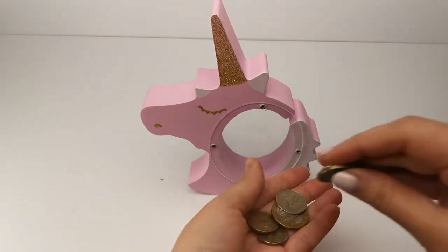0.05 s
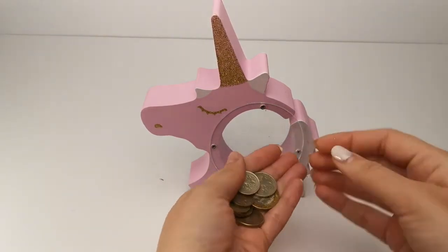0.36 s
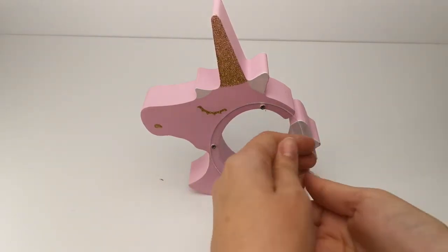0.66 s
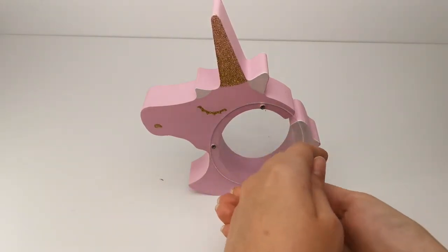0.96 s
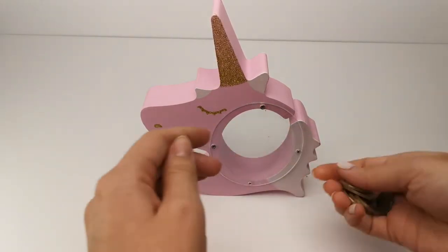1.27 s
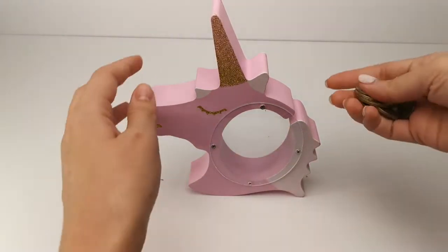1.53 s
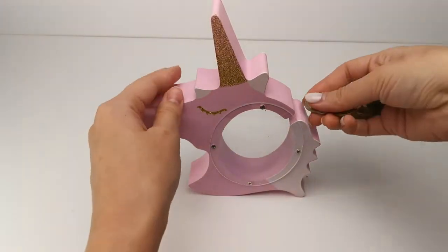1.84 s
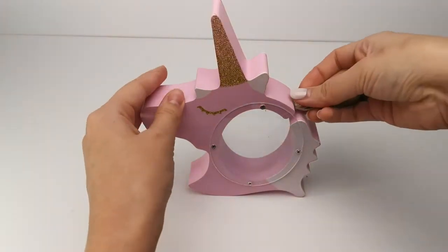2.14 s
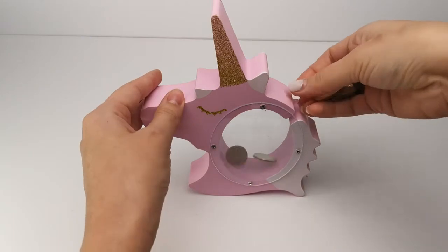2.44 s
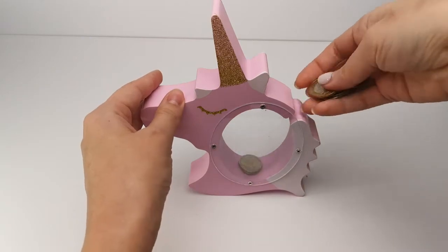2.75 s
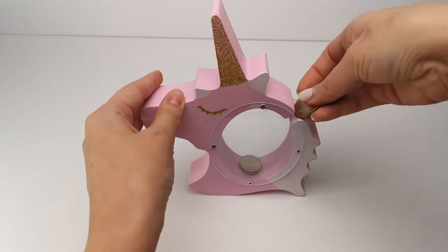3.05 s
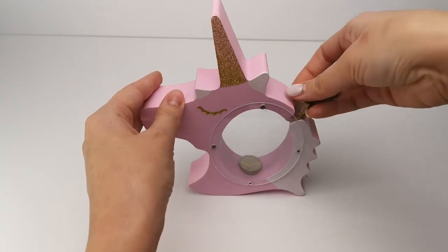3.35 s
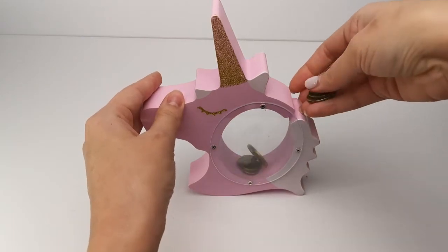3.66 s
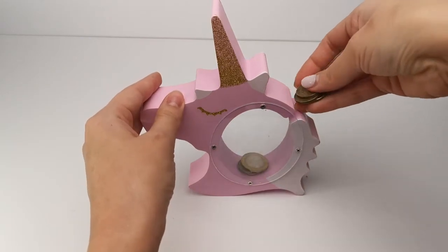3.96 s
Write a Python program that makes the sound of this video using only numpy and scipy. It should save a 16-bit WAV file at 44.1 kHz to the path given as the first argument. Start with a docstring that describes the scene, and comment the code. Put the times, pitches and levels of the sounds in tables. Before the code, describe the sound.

Coins clink and slide as they pass from one hand to the other. Then two scrape through the slot of a wooden money box in turn, dropping and rattling to rest, heard close up in a small, quiet room.

```python
"""A table in a small, quiet room, heard close up through a stereo pair of microphones.
For two seconds coins are gathered from one hand into the other, clinking and sliding, damped by the palm.
Then one knocks and scrapes through the slot of a wooden money box, drops at 2.5 s, bounces and rattles
to rest while the hollow box and the coin ring. A second scrapes in and lands at 3.7 s.
A short room tail follows each sound, and a faint rumble lies under it all."""
import sys
import numpy as np
from scipy import signal
from scipy.fft import rfft, irfft
from scipy.io import wavfile

SR = 44100
rng = np.random.default_rng(int(sys.argv[2]) if len(sys.argv) > 2 else 0)


def store_pcm(level_fs):
    """Save levels as 16-bit WAV."""
    pcm = np.round(np.clip(level_fs, -1, 1) * 32767).astype(np.int16)
    wavfile.write(sys.argv[1], SR, np.atleast_2d(pcm).T)


N = 176400

# Contacts: level is relative to the layer's gain, tone columns shade its colour, rattle adds scatter.
# Coins land and bounce in the box: (time [s], level [dB], thud [dB], hollow [dB], wood [dB], ring [dB],
# high ring [dB], top [dB], rattle [dB], left minus right [dB])
FALLS = [(2.4852, 21, -1.5, 1.5, -8, -10, -20, -30, 0.5, 2.5), (2.5128, -2, 2, 15, 25, 7, -3, -1, 7, 0.5),
         (2.5165, 1.5, 15.5, 17, 0, -18, -18, -20, 14, 7.5),
         (2.5298, 19, 8.5, 7.5, 1, -2.5, -21.5, -14.5, 5, 4.5),
         (2.576, -5.5, 11, 19.5, 13.5, 6, -24, -12, 8, 9), (2.599, 1.5, 4, 15.5, 17, -4, -34, -19, 16, 5.5),
         (2.637, 8.5, -16, -22, 1.5, 6, -9.5, -10, 19, 3),
         (2.6582, -3.5, -13, -19, 16, 9.5, 13.5, 13, 8, 11.5), (2.69, -1.5, 5, -6, 1.5, 9, 6, -7, 6, 6),
         (2.7182, -5.5, 2, 18, 14.5, 6, 14.5, 18, 40, 11.5), (2.738, -3, 4.5, 5, 2.5, -0.5, 11, 9, 23, 6),
         (3.6768, 2.5, 13.5, -4, 13.5, 8, 10, 5, 24, -0.5),
         (3.6882, 8.5, 10, 9.5, -1, 2.5, 5.5, 12, 8.5, 3.5), (3.6925, 4, 4, 16.5, -5.5, 10, 5, 2, -3, 5),
         (3.7335, -11.5, 19, 22.5, 20.5, -2, 8, 20, 0, 2), (3.7395, -3.5, 15, -12, -35, 6.5, 8, 16, 7, 5),
         (3.808, -10, 31, 11.5, 24.5, -4, 10, 24, 0, 1.5), (3.844, -3, -3, 5, 8, 10.5, 12, 18, 32, 1.5),
         (3.877, -3, 16.5, 14, 14, -4, 2, 1, 29, 2)]
# A coin's edge or a finger knocks at the slot: (time [s], level [dB], thud [dB], hollow [dB], ring [dB],
# top [dB], rattle [dB], left minus right [dB])
KNOCKS = [(1.961, -25.5, 27, -6, 20, -8, 16, 11), (2.108, -44, 32, 23, 5, 0, 24, 8.5),
          (2.189, -0.5, -8, -11.5, 13, -4, 6, 7), (2.366, -10, 3, 7, 19, 11.5, 27, 5.5),
          (2.432, -2.5, 5.5, 10, 16.5, -4, 30.5, 4.5), (3.1625, 1.5, -3, -8.5, 10, 13, 29, 1.5),
          (3.2305, -8.5, -2.5, 14.5, 14, 6, -7, -0.5), (3.2835, -15, 2, 18, -17, -11.5, 12, -3),
          (3.528, -9, -11, 13.5, -5, -11, 15, -1), (3.542, 0.5, -13, 8, 14.5, -4, 0, -5),
          (3.6115, 0.5, 0.5, 8.5, 15.5, -14, -5, 0.5)]
# Coin touches coin in the hand: (time [s], level [dB], hollow [dB], low ring [dB], high ring [dB],
# top [dB], rattle [dB], left minus right [dB])
CLINKS = [(0.2493, 9.5, -30, 8, -21, -1, -2, -1), (0.2512, 4.5, -25, -10, -1, -15, -3, 16.5),
          (0.2638, 10, -5, -22, -19, -2, 30, -10), (0.2675, 8, -14, -6, -20, -1, 11, 6.5),
          (0.2875, 6.5, -11.5, -7, 6, -2, -19, 0), (0.5105, -7, -16, -0.5, -31, -9, 8, 3),
          (0.5372, -12.5, -15, 11, -22, 9, -5, 0), (0.5625, -2.5, -8, 1.5, -10, 8.5, -10, 0),
          (0.721, -18.5, -41, 15.5, -10, -5, -5, -2), (0.8595, -14, 17, 14, 18, 7, 5, 2),
          (0.8685, -9, 8.5, 18, 14.5, 6, -3, -0.5), (0.8868, -6.5, 15, 2, 13.5, 5, 31, -1),
          (0.9065, -0.5, -12, 9, -7, 1, 20, 1), (0.9415, 2, -12, 0, -2, 0, 14, -1.5),
          (0.9985, -0.5, -6, -7, -3.5, 2.5, 6, -3), (1.0885, -14.5, 2, 2.5, 3, -1, 22, 5),
          (1.255, -8.5, 3, -3, 3, -13, 1, 5.5), (1.2875, -21.5, 9, 11, -9, -13, -7, 7),
          (1.363, -12, 5, 5, 15, 10, 25, 9.5), (1.5955, -8.5, 3, -5.5, 0.5, -8, 22, 10),
          (1.9855, -10, 2.5, -13, -7, -28, 14, 14), (2.012, -3.5, -8, -11, -15, -38, 17, 4),
          (2.8015, -3, 0.5, -11, 1, 4, 2, 6.5), (2.9355, -12.5, 6.5, -14, 10, -1.5, 11, 4),
          (3.1308, 3, -5, -23, 7, -6.5, 14, 3.5), (3.1435, -20, 12, 8, 6, 1, 17, 2),
          (3.559, -12.5, 22, 9, 18, 15, 20, 3), (3.956, -9, 16.5, -6, 5, 4, 20, 2)]
# An unshaded pivot, then where each tone column acts: (frequency [Hz])
FALL_TONE_HZ = [3500, 160, 500, 1850, 6000, 9900, 13000]
KNOCK_TONE_HZ = [2400, 280, 950, 5300, 10000]
CLINK_TONE_HZ = [6000, 1700, 3800, 8800, 13000]

# Friction strokes: (start [s], peak [s], end [s], level [dB])
SCRAPES = [(2.36, 2.425, 2.43, -46.5), (3.16, 3.19, 3.48, -55), (3.235, 3.282, 3.35, -43.5),
           (3.52, 3.541, 3.565, -31.5), (3.565, 3.595, 3.615, -50)]  # coin through the slot
ROLLS = [(2.53, 2.59, 2.9, -49), (2.63, 2.68, 2.71, -44.5), (3.68, 3.76, 4.028, -45)]  # coin on the floor of the box
RUBS = [(.13, .21, .27, -68.5), (.85, .95, 1.1, -67)]  # skin on skin and wood
# Coins slide over each other in the palm: (start [s], peak [s], end [s], level [dB], pitch [Hz])
SLIDES = [(-.06, 0.014, 0.023, -47, 7340), (0.464, 0.554, 0.546, -51, 5150),
          (0.51, 0.602, 0.61, -51.5, 4070), (0.73, 0.747, 0.61, -100, 3730), (0.825, 0.969, 1.1, -47, 7800),
          (1.277, 1.34, 1.446, -48, 5300), (1.75, 1.823, 1.8185, -52, 7100),
          (1.882, 2.0, 2.12, -60.5, 6100), (3.394, 3.495, 3.62, -55, 7500)]
# Soft movements: (time [s], level [dB])
THUMPS = [(2.718, 8.5), (3.688, 5), (3.734, 4.5), (3.877, 5)]  # a coin drops flat in the box
PALM_THUDS = [(.267, -18.5), (.8875, -12)]  # the coins' weight lands in the palm
FIDGET = [(0, -70), (.45, -82.5), (1.0, -71), (1.3, -70), (1.55, -72.5), (2.0, -85.5), (2.3, -81),
          (3.0, -71), (3.4, -84), (4, -65)]  # held coins keep shifting faintly
# A coin is free for a moment and sings: (time [s], pitch [Hz], level [dB], t60 [s])
PINGS = [(.207, 14700, -59, 0.33), (0.514, 10170, -53.5, 0.17), (.721, 3830, -53, 0.037),
         (2.365, 10200, -43, 0.25), (2.655, 9800, -31, 0.13), (3.614, 4080, -39, 0.049)]

# Modes of the box on its table and of the coins: (frequency [Hz], peak gain [dB], t60 [s])
BOX_MODES = [(114.8, 12.5, .3), (161.4, 12.5, .35), (184.3, 16, 0.55), (206.4, 8.5, 0.44),
             (225.2, 9.5, 0.43), (346.8, 6.5, 0.29), (385, -2, 0.3), (696, 1, 0.067), (936, 5.5, 0.18),
             (1116, -5.5, 0.6), (1658, 10, 0.093), (1763, 8.5, 0.25), (1817, 6, 0.3), (2140, 4.5, 0.38),
             (2656, 1, .25), (2960, -7.5, 0.54), (3310, 4.5, .4), (3340, -2.5, 0.446), (3493, 3, 0.19)]
FIRST_COIN_MODES = [(5100, 2.5, .1), (5950, 0, 0.15), (9770, 3.5, .12), (9990, 7.5, 0.05), (10650, 9.5, .2)]
SECOND_COIN_MODES = [(5600, 1, 0.085), (5930, 2.3, 0.19), (6950, 4.7, 0.11), (7000, 5.4, 0.02)]
HELD_COIN_MODES = [(3967, 1.5, 0.023), (4945, -10.5, 0.18), (5510, 1, .12), (7450, 5.5, 0.098),
                   (9800, 10, .1), (14700, 1, .15)]

# Spectra of each kind of contact and of the room tone: (frequency [Hz], relative level [dB])
FALL_COLOUR = [(50, -22.5), (110, -18.5), (350, -13.5), (500, -19.5), (900, -13), (1250, -17.5), (2700, -3),
               (3400, 3.5), (4000, -2.5), (4600, -13), (5700, 0.5), (6400, -9), (7500, -9.5), (8800, -19),
               (9800, -13.5), (11500, -23), (15000, -36)]
KNOCK_COLOUR = [(60, -14), (200, -7.5), (350, -1), (520, -7.5), (950, -2), (1250, -11), (1800, -2.5),
                (2600, 3), (4500, -23.5), (7500, -16), (11000, -28), (15000, -40)]
SCRAPE_COLOUR = [(100, -27), (350, 4.5), (520, -16.5), (850, -3), (940, -1), (1090, 3.5), (1250, -9.5),
                 (1650, -6), (2300, -9), (2600, 0.5), (3200, -8.5), (7500, -20), (15000, -47.5)]
THUMP_COLOUR = [(60, -19.5), (200, -12), (290, -9.5), (355, 5), (420, -8), (600, -13), (900, -22),
                (2000, -25), (8000, -60)]
CLINK_COLOUR = [(100, -20), (600, -24.5), (1300, -19), (2500, -13), (4000, -7.5), (5600, -2.5),
                (7800, -2.5), (9000, -10), (11000, -17.5), (15000, -26)]
PALM_COLOUR = [(25, 0), (70, 2), (200, -5), (500, -14), (1500, -24), (5000, -45)]
RUB_COLOUR = [(100, -14), (600, -12), (1000, -3), (1650, 0), (2300, -10), (8000, -22)]
ROOM_TONE_COLOUR = [(15, -7.5), (33, 7), (70, -8.5), (200, -7), (450, -21.5), (800, -18), (1500, -26),
                    (4000, -22.5), (7000, -48), (11000, -50.5), (15000, -50.5)]
# The small room's reverberation: (frequency [Hz], level [dB], t60 [s])
ROOM_TAIL = [(102, 1.5, 0.78), (353, -1.5, .6), (1000, -7.5, 0.51), (3400, -15, 0.4), (6500, -8, 0.34),
             (10000, -9.5, 0.27), (15000, 4, 0.097)]
# Likeness of scattered sound at the two microphones: (frequency [Hz], coherence [0-1])
MIC_COHERENCE = [(100, 0.84), (500, 0.9), (1500, 0.53), (4000, 0.31), (12000, .05)]

FALL_DB, KNOCK_DB, CLINK_DB, ROOM_TONE_DB = -4, -3.5, -5.5, -67
SCRAPE_SLIPS_PER_S, ROLL_SLIPS_PER_S, SLIDE_SLIPS_PER_S, RUB_SLIPS_PER_S = 1000, 800, 690, 5000
SECOND_COIN_S = 3.05  # contacts in the box ring the second coin from here on
MIC_SPREAD_S = 3e-5  # typical arrival difference between the microphones
PING_SPLIT_HZ, CUTOFF_HZ = 89, 15700


def money_box():
    """On the table, two coins in turn pass the slot, land and roll; the box and the coin ring."""
    knocks = from_db(KNOCK_DB) * hits(KNOCKS, KNOCK_COLOUR, KNOCK_TONE_HZ, scatter_db=14, t60=0.058)
    falls = from_db(FALL_DB) * hits(FALLS, FALL_COLOUR, FALL_TONE_HZ, scatter_db=1.5, t60=0.047)
    scrapes = friction(strokes(SCRAPES), SCRAPE_SLIPS_PER_S, SCRAPE_COLOUR, pan_db=0)
    rolls = friction(strokes(ROLLS), ROLL_SLIPS_PER_S, FALL_COLOUR, pan_db=0.5)
    touches = knocks + falls + scrapes + rolls
    is_first = np.arange(N) < SECOND_COIN_S * SR
    first_coin = ringing(touches * is_first, BOX_MODES + FIRST_COIN_MODES)
    second_coin = ringing(touches * ~is_first, BOX_MODES + SECOND_COIN_MODES)
    return first_coin + second_coin + soft_blows(THUMPS, THUMP_COLOUR)


def handful():
    """Mostly left of centre, coins clink and slide, damped by the palm."""
    clinks = from_db(CLINK_DB) * hits(CLINKS, CLINK_COLOUR, CLINK_TONE_HZ, scatter_db=4, t60=0.046)
    slides = sum(friction(strokes([stroke]), SLIDE_SLIPS_PER_S, damped_coin_colour(hz), pan_db=3.5)
                 for *stroke, hz in SLIDES)
    fidget_db = np.interp(np.arange(N) / SR, *np.transpose(FIDGET))
    fidget = friction(from_db(fidget_db), SLIDE_SLIPS_PER_S, CLINK_COLOUR, pan_db=4.5)
    return ringing(clinks + slides + fidget, HELD_COIN_MODES)


def pings():
    """A free coin's close pair of modes beats and dies away, differently at each microphone."""
    out = np.zeros((2, N))
    for s, hz, db, t60 in PINGS:
        start = int(s * SR)
        t = np.arange(min(SR // 2, N - start)) / SR
        pair = sum(gain * np.sin(2 * np.pi * (mode_hz * t + rng.random((2, 1))))
                   for mode_hz, gain in ((hz, 1), (hz + PING_SPLIT_HZ, 0.5)))
        attack = 1 - np.exp(-t / 0.00029)
        out[:, start:start + len(t)] += pair * attack * from_db(db - 60 * t / t60)
    return out


def hands():
    """Coins thud softly into the palm and skin rubs."""
    thuds = soft_blows(PALM_THUDS, PALM_COLOUR)
    return thuds + friction(strokes(RUBS), RUB_SLIPS_PER_S, RUB_COLOUR, pan_db=1)


def hits(rows, colour, tone_hz, scatter_db, t60):
    """Hard contacts share one colour, each shaded by how it strikes."""
    out, hz = np.zeros((2, N + SR)), bins(2048)
    for s, db, *tone, rattle_db, pan_db in rows:
        shade_db = at_hz(zip(tone_hz, [0, *tone]), hz)
        strike = click(db + at_hz(colour, hz) + shade_db)
        hit = convolve(contact(scatter_db + rattle_db, t60), strike)
        start = int(s * SR)
        out[:, start:start + hit.shape[1]] += hit * pan(pan_db)
    return out[:, :N]


def soft_blows(rows, colour):
    """Dull contacts of one colour."""
    blows = np.zeros(N)
    for s, db in rows:
        blows[int(s * SR)] = from_db(db)
    thud = convolve(contact(scatter_db=1, t60=0.031), click(at_hz(colour, bins(4096))))
    return convolve(blows, thud)


def friction(effort, slips_per_s, colour, pan_db):
    """Surfaces catch and let go in tiny uneven slips, as strong as the effort."""
    slipping = rng.random(N) < slips_per_s / SR
    size_db = 3.5 * np.minimum(rng.exponential(1, N), 4)
    slips = slipping * from_db(size_db) * rng.choice([-1, 1], N)
    grain = convolve(contact(scatter_db=11.5, t60=0.012), click(at_hz(colour, bins(2048))))
    return effort * rms_one(convolve(slips, grain)) * pan(pan_db)


def strokes(rows):
    """The effort of each movement swells to a peak and fades."""
    t = np.arange(N) / SR
    return sum(from_db(db) * np.interp(t, times, [0, 1, 0]) ** 1.44 for *times, db in rows)


def damped_coin_colour(pitch_hz, peak_db=6, width_octaves=0.35):
    """The clink's spectrum with the broad peak of a damped coin."""
    hz = np.geomspace(100, 16000, num=120)
    peak = np.exp(-(np.log2(hz / pitch_hz) / width_octaves) ** 2)
    return np.c_[hz, at_hz(CLINK_COLOUR, hz) + peak_db * peak]


def ringing(touches, modes):
    """The contacts pass through and set a body's modes ringing."""
    t, response = np.arange(SR) / SR, 0
    for hz, db, t60 in modes:
        decay = np.log(1000) / t60
        response += from_db(db) * 2 * decay / SR * np.exp(-decay * t) * np.cos(2 * np.pi * hz * t)
    return touches + convolve(touches, response)


def contact(scatter_db, t60, size=4096):
    """One touch reaches both microphones, with near reflections off hands, box and table."""
    samples = np.arange(size)
    lag = np.clip(rng.normal() * MIC_SPREAD_S * SR / 2, -2, 2) * np.array([[1], [-1]])
    direct = np.sinc(samples - 4 - lag)
    scatter = diffuse(size) * from_db(-60 * samples / SR / t60)
    scatter /= np.sqrt(np.sum(scatter ** 2) / 2)
    return (direct + from_db(scatter_db) * scatter) / np.hypot(1, from_db(scatter_db))


def room(direct):
    """The walls return a diffuse tail that builds up quickly and dies sooner in the treble."""
    noise, t, tail = rfft(diffuse(SR)), np.arange(SR) / SR, 0
    for hz, db, t60 in ROOM_TAIL:
        band = at_hz([(row[0], row[0] == hz) for row in ROOM_TAIL], bins(SR))
        decay = np.log(1000) / t60
        tail += from_db(db) * np.sqrt(2 * decay / SR) * np.exp(-decay * t) * irfft(noise * band)
    build_up = 1 - np.exp(-t / 0.0027)
    return direct + convolve(direct, tail * build_up)


def room_tone():
    """Quiet rumble and hiss all around the microphones."""
    spectrum = rfft(diffuse(N)) * from_db(at_hz(ROOM_TONE_COLOUR, bins(N)))
    return from_db(ROOM_TONE_DB) * rms_one(irfft(spectrum, N))


def diffuse(size):
    """White noise at the two microphones, alike in the bass and unrelated in the treble."""
    mid, side = rfft(rng.standard_normal((2, size)))
    alike = at_hz(MIC_COHERENCE, bins(size))
    return irfft(np.sqrt((1 + alike) / 2) * mid + np.sqrt((1 - alike) / 2) * side * [[1], [-1]], size)


def click(db):
    """The shortest causal click that has the given spectrum."""
    cepstrum = irfft(np.log(from_db(db)))
    half = len(cepstrum) // 2
    causal = np.r_[cepstrum[0], 2 * cepstrum[1:half], np.zeros(half)]
    return irfft(np.exp(rfft(causal)))


def at_hz(points, hz):
    """Reads (frequency, value) points on a log-frequency axis."""
    point_hz, values = np.transpose(sorted(map(tuple, points)))
    return np.interp(np.log(np.maximum(hz, 1)), np.log(point_hz), values)


def from_db(db):
    return 10 ** (np.asarray(db) / 20)


def pan(db):
    return from_db([[db / 2], [-db / 2]])


def rms_one(x):
    return x / np.sqrt(np.mean(x ** 2) + 1e-20)


def bins(size):
    return np.fft.rfftfreq(size, 1 / SR)


def convolve(a, b):
    return signal.fftconvolve(np.atleast_2d(a), np.atleast_2d(b), axes=1)[:, :N]


def scene():
    """Coins, hands and box in the small room, as they reach the microphones."""
    return room(handful() + hands() + money_box() + pings()) + room_tone()


def record(dry):
    """A steep low-pass cuts the top of both microphone channels."""
    return signal.sosfilt(signal.ellip(10, 0.3, 80, CUTOFF_HZ, fs=SR, output="sos"), dry)


dry = scene()
out = record(dry)
store_pcm(out)
```